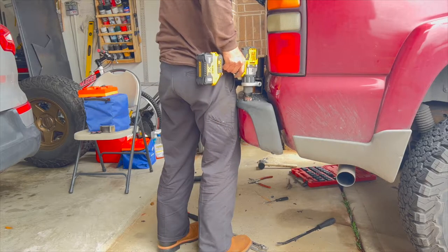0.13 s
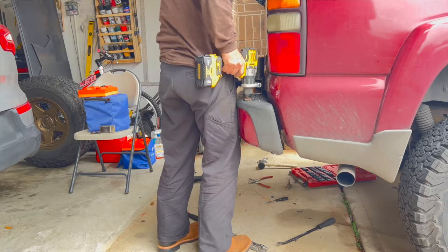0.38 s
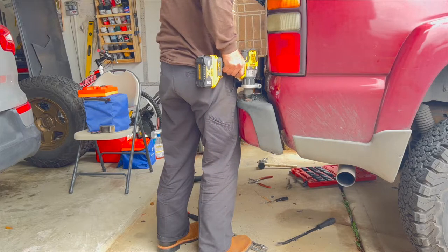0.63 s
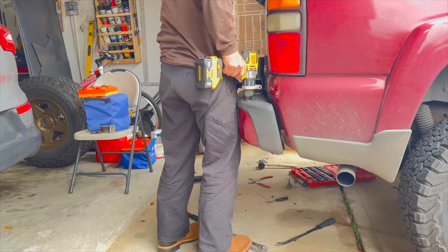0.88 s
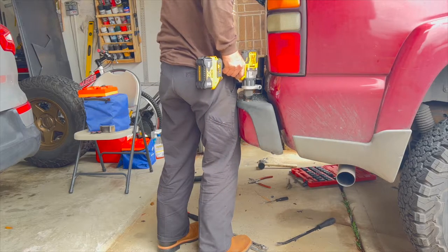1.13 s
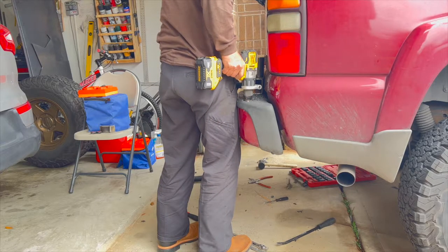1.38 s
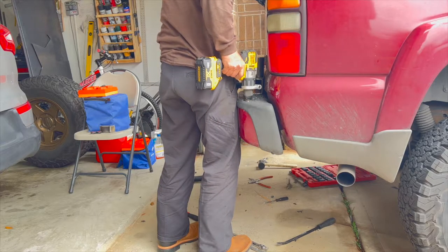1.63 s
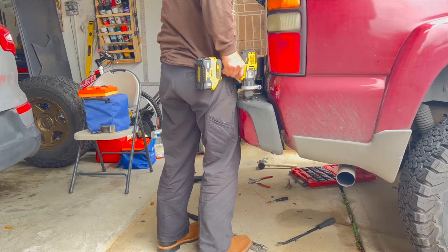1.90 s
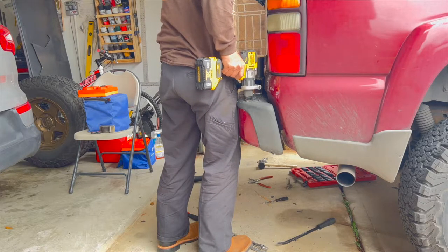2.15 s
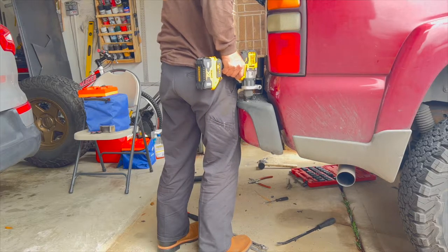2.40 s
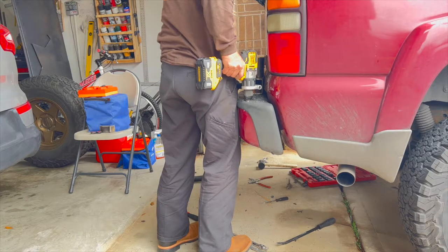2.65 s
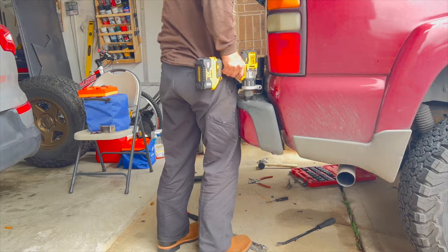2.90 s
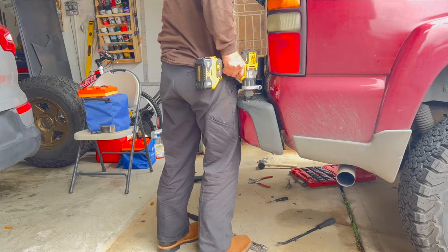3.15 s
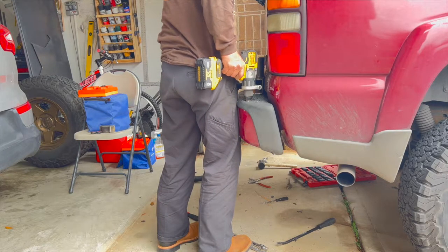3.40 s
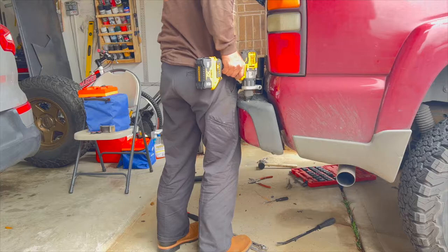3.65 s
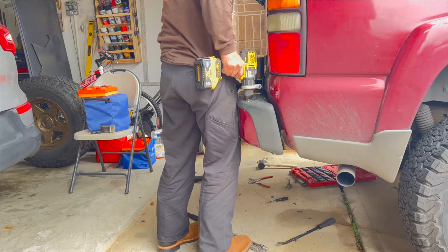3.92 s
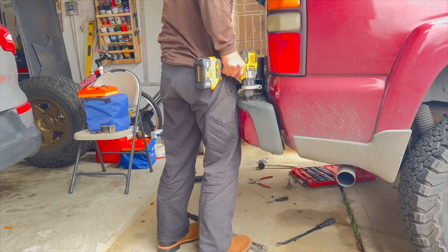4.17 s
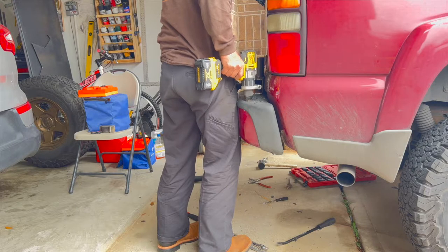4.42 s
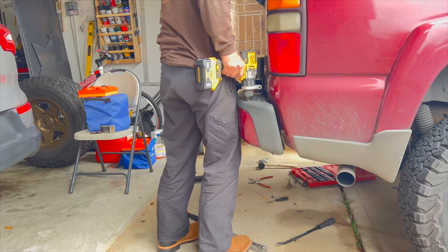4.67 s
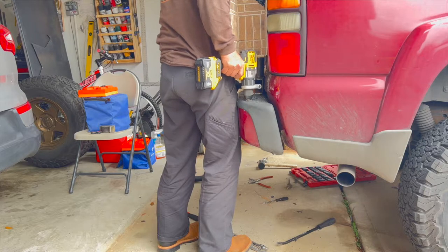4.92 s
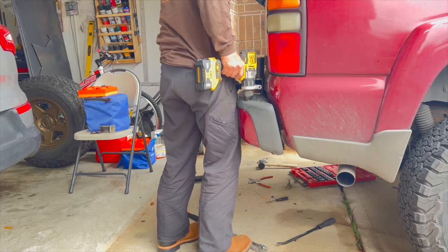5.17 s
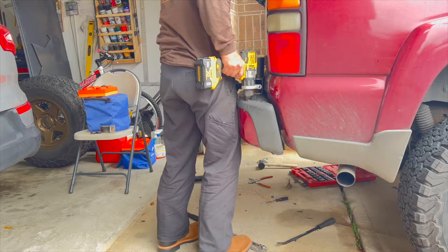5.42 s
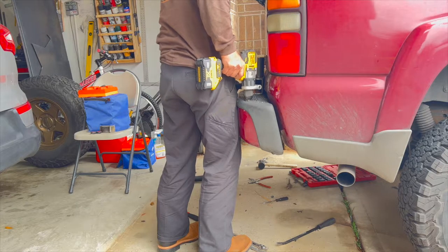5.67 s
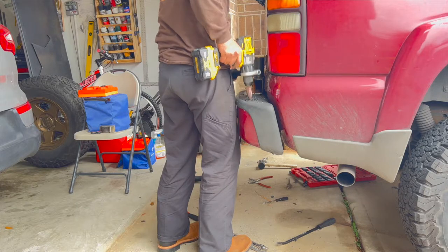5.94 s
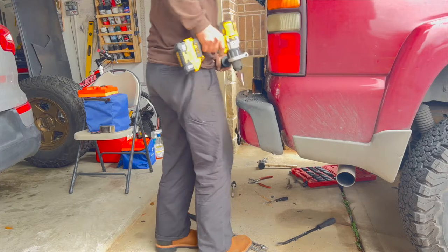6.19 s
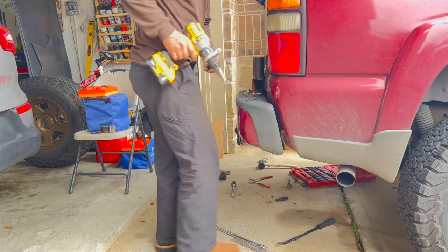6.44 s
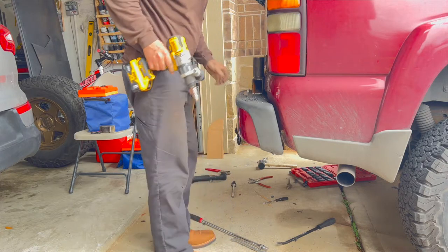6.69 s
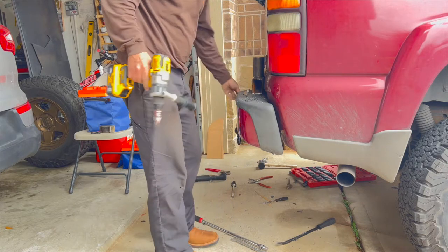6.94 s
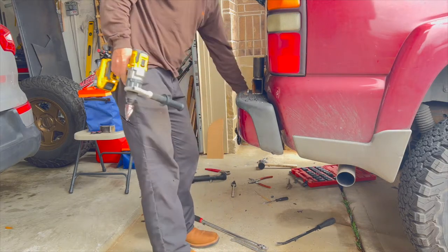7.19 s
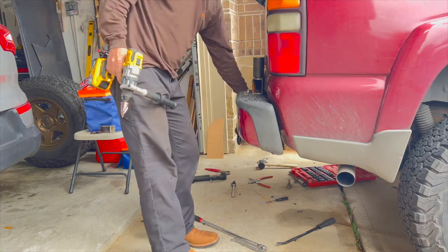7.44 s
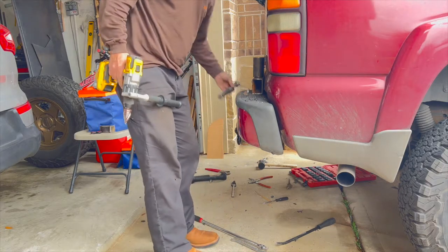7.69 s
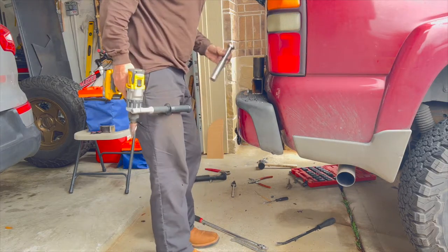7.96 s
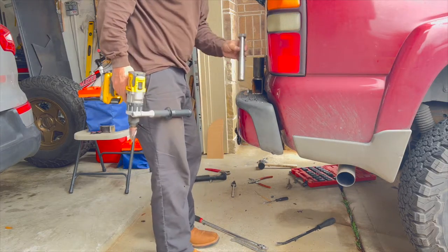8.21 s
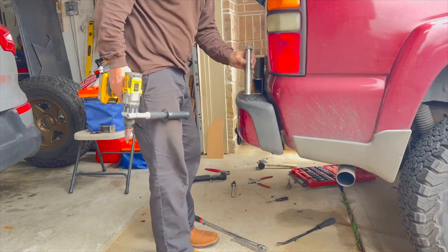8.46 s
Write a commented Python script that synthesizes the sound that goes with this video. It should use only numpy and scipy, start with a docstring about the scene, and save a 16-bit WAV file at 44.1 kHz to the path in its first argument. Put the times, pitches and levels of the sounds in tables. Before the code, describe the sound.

Harsh overloaded drilling into a steel panel, rhythmic grinding groans about fifteen per second, then a quick stop, a shoe scuff and a rod's light rattle.

```python
"""Drilling a steel bumper in an open garage

A cordless drill whines on orders of its rotor speed, as sines, over the dense clicks of its gears and fan.
Twice a turn a cutting edge bites: noisy chatter shakes the bumper's modes into a groan, and a chip cracks off,
loud enough to overload the microphone. The drill stops at about 6 s and leaves filtered-noise room tone,
low rumble, a thin distant whistle, a shoe scuff, a rod being picked up and small handling clicks."""
import sys
import numpy as np
from scipy import signal
from scipy.fft import rfft, irfft
from scipy.io import wavfile
from scipy.ndimage import uniform_filter1d

SR = 44100
rng = np.random.default_rng(int(sys.argv[2]) if len(sys.argv) > 2 else 0)


def unload_audio(sound):
    """Save the sound as a 16-bit wav file, at the path given as the first command line argument."""
    columns = np.transpose(np.atleast_2d(sound))
    # keep every value between -1 and 1, then stretch to whole-number steps
    steps = np.round(np.clip(columns, -1, 1) * 32767)
    wavfile.write(sys.argv[1], SR, steps.astype(np.int16))


def volts_from_db(level):
    """Convert decibel levels to linear amplitude ratios."""
    exponent = np.asarray(level, float) / 20
    return 10 ** exponent


N = 378378

# nominal motor speed as pole-pass pitch; it brakes, spins up again and brakes to a stop: (time [s], pitch [Hz])
MOTOR = [(0, 1477), (.062, 1460), (.1, 1112), (.15, 547), (.2, 286), (.27, 392.7), (.35, 1242), (.4, 1410),
         (.45, 1450), (.64, 1520), (.75, 1522), (.9, 1540), (1.3, 1542), (2, 1548), (4.02, 1548),
         (4.3, 1544), (5.7, 1548), (5.885, 1542), (5.97, 638), (6.05, 250)]
# bites of a cutting edge, two a turn: (time [s], relative groan level [dB], relative crack level [dB])
BITES = [(.368, -11, -12), (.724, -28.5, -39), (.742, -17, -26.5), (.808, -30.5, -38.5),
         (0.86, -10.5, -15.5), (1.057, -13, -43.5), (1.189, -8, -29), (1.261, -10, -37), (1.322, -8, -27.5),
         (1.391, -12, -11.5), (1.455, -8, -14.5), (1.522, -9, -11), (1.59, -8.5, -10), (1.663, -14, -21.5),
         (1.719, -10, -10.5), (1.79, -12.5, -11), (1.853, -11, -12), (1.92, -15, -16), (1.985, -11, -10),
         (2.053, -14, -11), (2.115, -10, -9), (2.179, -11.5, -14.5), (2.252, -10, -12.5), (2.318, -13, -15),
         (2.384, -10, -11), (2.455, -12.5, -15), (2.509, -9.5, -11.5), (2.579, -11.5, -19),
         (2.647, -10, -25), (2.715, -11.5, -15), (2.787, -10.5, -14), (2.852, -11, -15),
         (2.918, -11.5, -16), (2.989, -14.5, -19.5), (3.053, -11, -29.5), (3.12, -13.5, -15.5),
         (3.179, -11, -20.5), (3.253, -14.5, -17), (3.316, -9.5, -15), (3.386, -14.5, -15),
         (3.452, -14, -14), (3.509, -11, -19), (3.581, -13.5, -14.5), (3.642, -8.5, -17),
         (3.716, -12, -14.5), (3.784, -8, -10.5), (3.851, -10.5, -14), (4.033, -14, -18.5),
         (4.053, -8.5, -13.5), (4.117, -14.5, -14), (4.187, -12.5, -29), (4.249, -13.5, -20),
         (4.312, -17.5, -34.5), (4.378, -9.5, -18), (4.45, -17, -15.5), (4.511, -6.5, -11),
         (4.581, -15.5, -21.5), (4.645, -9, -14), (4.712, -9.5, -10.5), (4.775, -21, -28.5),
         (4.818, -15, -29), (4.843, -16.5, -22), (4.912, -16.5, -21.5), (4.977, -10, -14),
         (5.04, -14, -19.5), (5.121, -18.5, -33), (5.173, -12.5, -27.5), (5.241, -25.5, -34.5),
         (5.3, -7.5, -15), (5.382, -20, -38), (5.432, -5.5, -10.5), (5.51, -15.5, -18), (5.636, -11, -25),
         (5.691, -15.5, -63)]


def rms_one(x):
    """Scale to unit rms."""
    return x / np.sqrt(np.mean(x ** 2) + 1e-20)


def in_time(rows):
    """Columns of a curve, interpolated at every sample."""
    s, *columns = np.transpose(rows)
    return [np.interp(np.arange(N) / SR, s, c) for c in columns]


def peaks_db(modes, hz):
    """Summed bell-shaped gains of resonances, in dB."""
    return sum(gain_db / (1 + (2 * (hz - centre_hz) / width_hz) ** 2) for centre_hz, width_hz, gain_db in modes)


def colour(x, spectrum, modes=()):
    """Causal (minimum-phase) filter that keeps the rms of white noise."""
    size = 8192
    hz = np.maximum(np.arange(size // 2 + 1) * SR / size, 1)
    points = np.array(spectrum)
    level_db = np.interp(np.log(hz), np.log(points[:, 0]), points[:, 1]) + peaks_db(modes, hz)
    # folding the cepstrum onto positive time gives minimum phase
    cepstrum = irfft(np.log(volts_from_db(level_db)))
    cepstrum[1:size // 2] *= 2
    cepstrum[size // 2 + 1:] = 0
    response = irfft(np.exp(rfft(cepstrum)))
    return signal.fftconvolve(x, response / np.sqrt(np.sum(response ** 2)))[:N]


def drift(rate):
    """Slow random wander of spread 1, faster for a higher rate: twice-smoothed noise, one knot per 64 samples."""
    knots = rng.standard_normal(N // 64 + 600)
    r = np.exp(-128 * np.pi * rate / SR)
    settled = signal.lfilter([1], [1, -2 * r, r * r], knots)[500:]
    return np.interp(np.arange(N) / 64, np.arange(len(settled)), rms_one(settled))


def grains(per_s, spread_db):
    """Random clicks of uneven size and either sign, rms 1."""
    sizes = volts_from_db(spread_db * np.minimum(rng.exponential(1, N), 4)) * rng.choice([-1, 1], N)
    return rms_one(sizes * (rng.random(N) < per_s / SR))


def burst(start_s, rise_s, hold_s, fall_s):
    """Sample span and envelope: rise, hold, exponential fall."""
    first = round(start_s * SR)
    t = np.arange(min(round(.25 * SR), N - first)) / SR
    rise = 1 - np.exp(-t / rise_s)
    fall = np.exp(-np.maximum(t - hold_s, 0) / fall_s)
    return slice(first, first + len(t)), rise * fall


def turning():
    """1 while the gears move, 0 at rest, with short ramps between."""
    # the gear train is in motion: (from [s], to [s])
    spans = [(-.1, .147), (.238, 5.98)]
    t = np.arange(N) / SR
    return uniform_filter1d(sum(1. * (t > on) * (t < off) for on, off in spans), size=600)


def load(rub_db):
    """Slow mean of the feed pressure above its idle level, in dB."""
    idle_db = -26
    return np.maximum(uniform_filter1d(rub_db, size=5000) - idle_db, 0)


def room_tone():
    """Steady air noise of the garage, dull and slightly uneven."""
    # (time [s], level [dB])
    tone_level = [(0, -47), (6.6, -51.5), (6.85, -51.5), (7.4, -50), (8.58, -48)]
    # (frequency [Hz], relative density [dB per Hz])
    tone_spectrum = [(25, -0.5), (80, -1), (110, -9), (200, -6), (300, -10.5), (800, -15.5), (1100, -14.5),
                     (1500, -20.5), (2500, -26.5), (3500, -37), (4500, -44), (8000, -52.5), (16000, -54)]
    level_db = in_time(tone_level)[0] + 1.3 * drift(4)
    return volts_from_db(level_db) * colour(rng.standard_normal(N), tone_spectrum)


def rumble():
    """Lumpy low noise, stronger while the drill shakes the vehicle, with dull thuds."""
    # (time [s], level [dB])
    thuds = [(.385, -30), (7.6, -51)]
    rest_db, shake_db = -63, -50.5
    level = volts_from_db(rest_db) + volts_from_db(shake_db) * turning()
    for s, level_db in thuds:
        span, shape = burst(s, rise_s=.02, hold_s=0, fall_s=0.1)
        level[span] += volts_from_db(level_db) * shape
    low_band = signal.butter(2, [35, 170], "band", fs=SR, output="sos")
    lumps = signal.sosfilt(low_band, rng.standard_normal(N))
    return level * rms_one(lumps)


def whistle():
    """A thin sine from far off, wavering in pitch and level."""
    # (time [s], mean pitch [Hz], mean level [dB])
    track = [(6.05, 1095, -64.5), (6.4, 1090, -60.5), (7.3, 1062, -61.5), (8, 1030, -61), (8.2, 1070, -72),
             (8.58, 1015, -73.5)]
    mean_hz, mean_db = in_time(track)
    level = volts_from_db(mean_db + 2.5 * drift(11))
    pitch_hz = mean_hz * (1 + 0.0034 * drift(20))
    return level * np.sin(2 * np.pi * np.cumsum(pitch_hz) / SR)


def background():
    """The diffuse sound around the work: room tone, rumble and the distant whistle."""
    return room_tone() + rumble() + whistle()


def scuffs():
    """Shoes and clothes rub as the worker moves: coloured grit under slow envelopes."""
    # (time [s], rise [s], hold [s], level [dB])
    moves = [(6.464, .002, 0.068, -45.5), (6.92, .02, .04, -63), (7.08, .025, 0.18, -65),
             (7.393, .04, 0.046, -53)]
    # (frequency [Hz], relative density [dB per Hz])
    grit_spectrum = [(200, -19.5), (450, 7), (1200, -2), (3100, 1), (5500, -12), (8000, -28), (14000, -48)]
    level = np.zeros(N)
    for s, rise_s, hold_s, level_db in moves:
        span, shape = burst(s, rise_s, hold_s, fall_s=0.022)
        level[span] += volts_from_db(level_db) * shape
    return level * colour(grains(3600, 3.5), grit_spectrum)


def ticks():
    """Small ticks ring one damped mode each; knocks ring all modes of the rod."""
    # trigger, brake and small handling ticks: (time [s], peak level [dB], ring [Hz], ring width [Hz])
    clicks = [(.136, -31, 6000, 8840), (.203, -32, 500, 200), (.245, -47, 3500, 3960),
              (5.966, -34.5, 5000, 8980), (6.268, -55, 3050, 500), (6.272, -60, 5000, 150),
              (6.356, -42.5, 940, 200), (6.431, -54, 3914, 2920), (6.467, -37, 1600, 2600),
              (6.669, -51, 1690, 299), (6.918, -48, 2900, 900), (6.918, -58, 5150, 1800),
              (6.944, -51, 1800, 110), (6.944, -54, 3960, 5000), (7.15, -48, 2500, 800),
              (7.188, -52, 2500, 900), (8.08, -49, 884, 297), (8.125, -48.5, 2610, 80.4)]
    # a steel rod is picked up: (time [s], level [dB])
    rod_knocks = [(7.386, -42), (7.414, -38), (7.425, -43), (7.437, -37.5), (7.452, -41), (7.464, -45)]
    # modes of the rod: (frequency [Hz], width [Hz], relative level [dB])
    rod_modes = [(500, 260, 2), (1070, 99, -0.5), (1390, 260, -4.5), (3270, 1600, -8)]
    rings = list(clicks)
    for s, level_db in rod_knocks:
        for hz, width_hz, mode_db in rod_modes:
            rings.append((s, level_db + mode_db, hz, width_hz))
    out = np.zeros(N)
    for s, level_db, ring_hz, width_hz in rings:
        span, shape = burst(s, rise_s=0.00053, hold_s=0.00095, fall_s=0.0034)
        edges_hz = [max(ring_hz - width_hz / 2, 50), ring_hz + width_hz / 2]
        band = signal.butter(2, edges_hz, "band", fs=SR, output="sos")
        ring = signal.sosfilt(band, shape * rng.standard_normal(len(shape)))
        out[span] += volts_from_db(level_db) * ring / np.max(np.abs(ring))
    return out


def handling():
    """The worker's small noises: scuffs of grit and ringing ticks."""
    return scuffs() + ticks()


def lingering(gate):
    """The gate plus a weak, slowly dying tail: a faint hiss lingers after the gears stop."""
    linger_db, linger_s = -19.5, .17
    r = np.exp(-1 / (linger_s * SR))
    return gate + volts_from_db(linger_db) * signal.lfilter([1 - r], [1, -r], gate)


def gears(rub_db):
    """Gear teeth and cooling fan: fine, dense rattle coloured by the case, louder with speed and load."""
    # (frequency [Hz], relative density [dB per Hz])
    rattle_spectrum = [(300, -6), (1000, -6), (1600, 5.5), (2300, -6.5), (3800, -8.5), (5000, -6.5),
                       (7000, -15), (9500, -20.5), (13000, -19), (16000, -26)]
    # resonances and notches of the gear case: (frequency [Hz], width [Hz], gain [dB])
    case_modes = [(3850, 340, 12), (4700, 240, -10), (6330, 290, 4.5), (7220, 230, -5.5), (7730, 410, 8.5),
                  (8400, 280, -2), (8700, 350, 6), (9900, 190, -3), (9920, 330, 9.5), (11240, 300, 2.5),
                  (15300, 600, 15)]
    full_hz, full_speed_db, per_octave_db = 1550, -34, 3.5
    load_share = .45   # dB of rattle per dB of load
    octaves = np.log2(in_time(MOTOR)[0] / full_hz)
    rattle_db = full_speed_db + per_octave_db * octaves + load_share * load(rub_db)
    level = lingering(turning()) * volts_from_db(rattle_db + 0.83 * drift(60))
    return level * colour(grains(9000, 3.3), rattle_spectrum, case_modes)


def sag():
    """Share of speed lost to the bites, less what the late, overshooting speed control adds back."""
    full_bite, recovery_s = .05, .02   # share of speed lost to a bite at 0 dB; fall time
    regulator_s, overshoot = .12, 1.8
    loss = np.zeros(N)
    for s, groan_db, _ in BITES:
        span, shape = burst(s, rise_s=.008, hold_s=.02, fall_s=recovery_s)
        loss[span] += full_bite * volts_from_db(groan_db) * shape
    r = np.exp(-1 / (regulator_s * SR))
    return loss - overshoot * signal.lfilter([1 - r], [1, -r], loss)


def motor(rub_db):
    """Sines locked to the rotor; a partial flares as it glides through a shell resonance."""
    # how loudly the drill body radiates: (pitch [Hz], pole partials [dB], current partials [dB])
    radiation = [(250, -110, -130), (400, -63.5, -76.5), (705, -41, -63), (980, -20, -57),
                 (1106, -32.5, -55), (1260, -19.5, -41), (1408, -17.5, -39.5), (1456, -22.5, -34),
                 (1531, -35, -30), (1553, -27, -29)]
    # whine partials of each kind: (multiple of the pole-pass pitch, relative level [dB])
    pole_orders = [(1, -1), (2.5, -34.5), (4, -21)]
    current_orders = [(.25, -8.5), (2, -4.5), (2.25, -38), (5.75, -19.5)]
    # drill shell resonance and a dull range above it: (frequency [Hz], width [Hz], gain [dB])
    housing = [(3517, 500, 23.5), (5600, 2200, -12)]
    current_damping = 0.13   # dB that the current partials lose per dB of load
    speed_hz = uniform_filter1d(in_time(MOTOR)[0], size=400)
    pitch_hz = speed_hz * (1 + .002 * drift(6) - sag())
    phase = 2 * np.pi * np.cumsum(pitch_hz) / SR
    at_hz, pole_db, current_db = np.transpose(radiation)
    pole_drive_db = np.interp(speed_hz, at_hz, pole_db)
    current_drive_db = np.interp(speed_hz, at_hz, current_db) - current_damping * load(rub_db)
    out = np.zeros(N)
    for orders, drive_db in ((pole_orders, pole_drive_db), (current_orders, current_drive_db)):
        for multiple, level_db in orders:
            shell_db = peaks_db(housing, multiple * pitch_hz)
            gain = volts_from_db(level_db + drive_db + shell_db + 1.1 * drift(24))
            out += gain * np.sin(multiple * phase)
    return np.sqrt(2) * out


def rasp():
    """A short scratchy skid of the bit after its first bite."""
    # (frequency [Hz], relative density [dB per Hz])
    rasp_spectrum = [(1500, -27), (2100, 0), (2600, -1.5), (3400, -27)]
    level = np.zeros(N)
    span, shape = burst(.385, rise_s=0.0046, hold_s=.02, fall_s=0.037)
    level[span] = volts_from_db(-21.5) * shape
    return colour(level * grains(3000, 2.7), rasp_spectrum)


def chatter(force):
    """Stick-slip clicks feed now one panel mode, now another, each a two-pole resonator."""
    # panel modes that the chatter can lock onto for a moment: (frequency [Hz], width [Hz], relative level [dB])
    lock_modes = [(350.1, 44, -12), (554.5, 68, -10.5), (733, 37, -18.5), (1090, 166, -8.5),
                  (1297, 54, -15), (1445, 47, -17)]
    lock_spread_db, lock_rate = 4.5, 10.7
    out = np.zeros(N)
    for hz, width_hz, level_db in lock_modes:
        r = np.exp(-np.pi * width_hz / SR)
        lock = volts_from_db(lock_spread_db * np.clip(drift(lock_rate), -2, 2))
        slips = force * grains(2500, 2.14) * lock
        poles = [1, -2 * r * np.cos(2 * np.pi * hz / SR), r * r]
        tone = signal.lfilter([1, 0, -1], poles, slips)
        out += volts_from_db(level_db) * np.sqrt(1 - r) * tone
    return out


def cutting(rub_db):
    """Stick-slip chatter, steady plus a swell per bite, shakes the panel; each bite adds a knock and a crack."""
    # how long an edge stays in the metal before its force is allowed for: (time [s], hold [s])
    hold_curve = [(.3, 0.021), (1.1, 0.0048), (1.75, .017), (2.05, 0.034), (2.7, 0.039), (3.1, .022),
                  (3.55, .026), (4.2, 0.013), (5.7, 0.014)]
    # broad radiation of the panel: (frequency [Hz], relative density [dB per Hz])
    panel_spectrum = [(15, -46.5), (25, -27), (311, -6.5), (349, -1.5), (471, 0.5), (553, 0.5), (816, -2.5),
                      (1290, -3), (2340, -13.5), (3230, -13.5), (6000, -34.5), (7800, -47.5), (13200, -120)]
    # panel resonances: (frequency [Hz], width [Hz], gain [dB])
    panel_modes = [(200, 152, 8.5), (381, 12, -1), (570, 69, 3.5), (708, 38, -0.5), (1090, 440, 2),
                   (1297, 9.2, -2), (1440, 81, 2.5), (1700, 30, 3.5), (2600, 40, 3), (3300, 71, 6.5),
                   (3800, 24, -6.5), (4670, 60, 6.5)]
    # body and treble of a breaking chip: (frequency [Hz], relative density [dB per Hz])
    crack_spectrum = [(300, -34), (1500, -7), (3200, 11.5), (5000, -2.5), (7000, -12.5), (10000, -35)]
    splinter_spectrum = [(2000, -11.5), (5000, 7), (8000, 0.5), (12000, -2.5), (16000, -2)]
    hold_per_db, chip_delay_per_s = 0.2263, 11   # a harder bite holds longer; chip breaks after this x hold^2
    crack_fall_s, splinter_fall_s = 0.016, 0.0063
    force = volts_from_db(rub_db + 2.0 * drift(23))
    snap, splinter, knock = np.zeros((3, N))
    for s, groan_db, crack_db in BITES:
        hold_s = np.interp(s, *np.transpose(hold_curve)) * np.exp(hold_per_db * (groan_db + 9.5))
        span, shape = burst(s, .0008, hold_s, fall_s=0.012)
        force[span] += volts_from_db(groan_db) * shape
        knock[span.start] += volts_from_db(groan_db + 16.5)   # the edge catches: one blow on the panel
        chip_s = s + chip_delay_per_s * hold_s ** 2
        span, shape = burst(chip_s, 0.0006, 0, crack_fall_s)
        snap[span] += volts_from_db(crack_db) * shape
        # the treble dies first
        splinter[span] += volts_from_db(crack_db - 4.5) * shape ** (crack_fall_s / splinter_fall_s)
    shaking = volts_from_db(-1.0) * force * grains(2500, 2.68) + knock
    groan = colour(shaking, panel_spectrum, panel_modes) + chatter(force)
    crack = colour(snap * grains(6000, 2.9), crack_spectrum, panel_modes)
    return groan + crack + colour(splinter * grains(4900, 3.0), splinter_spectrum)


def garage(x):
    """Diffuse tail after a short gap: darkened noise under the sum of a main decay and a weaker, quicker one."""
    main_t60_s, quick_t60_s, quick_db = 0.35, 0.24, -12
    t = np.arange(SR) / SR
    decay = volts_from_db(-60 * t / main_t60_s) + volts_from_db(quick_db - 60 * t / quick_t60_s)
    echoes = rng.standard_normal(len(t)) * decay * (t > .006)
    tail = signal.lfilter([1], [1, -.4], echoes)
    return signal.fftconvolve(x, tail / np.sqrt(np.sum(tail ** 2)))[:N]


def scene():
    """Drill, bumper and handling share the garage; the background is already diffuse."""
    # feed pressure, as the steady rubbing of the bit in the hole: (time [s], relative level [dB])
    rubbing = [(0, -26), (.1, -32.5), (.23, -52), (.25, -40.5), (.36, -36.5), (.395, -25.5), (.5, -33.5),
               (.7, -32.5), (.73, -23.5), (.84, -26.5), (1.3, -26), (1.8, -19), (2.4, -17.5), (2.75, -18),
               (3.8, -18.5), (4.03, -35.5), (4.1, -24), (4.8, -21.5), (5.2, -24.5), (5.4, -23.5),
               (5.7, -27), (5.97, -49.5), (6.1, -74), (6.3, -100)]
    rub_db, = in_time(rubbing)
    near = handling() + gears(rub_db) + motor(rub_db) + rasp() + cutting(rub_db)
    reverb = volts_from_db(-16.5) * garage(near)
    return (near + reverb + background())[None]


def band_limit(x):
    """A steep low-pass at the top of the band."""
    return signal.sosfilt(signal.butter(12, 15820, fs=SR, output="sos"), x)


def record(dry):
    """The microphone input overloads with flat tops and dips for a few ms at a steady interval; band edges roll off."""
    ceiling, knee = .5, 6.0   # a higher knee bends more sharply
    first_s, every_s, dip_s, dips = .0985, .7968, .0065, 9
    clipped = dry / (1 + np.abs(dry / ceiling) ** knee) ** (1 / knee)
    gate = np.ones(N)
    for s in first_s + every_s * np.arange(dips):
        gate[round(s * SR):round((s + dip_s) * SR)] = volts_from_db(-28.5)
    gate = uniform_filter1d(gate, size=30)
    band = signal.butter(1, [40, 7000], "band", fs=SR, output="sos")
    return band_limit(signal.sosfilt(band, clipped * gate))


dry = scene()
out = record(dry)
unload_audio(out)
```